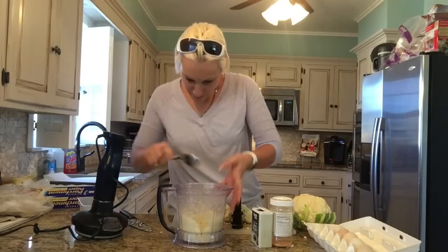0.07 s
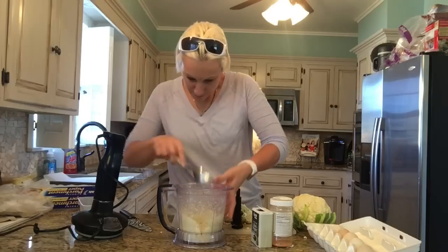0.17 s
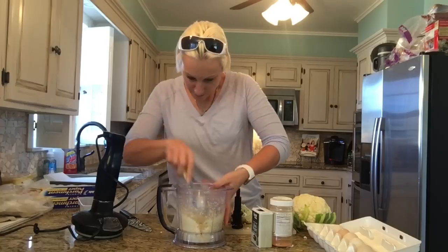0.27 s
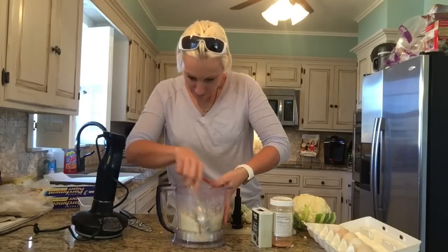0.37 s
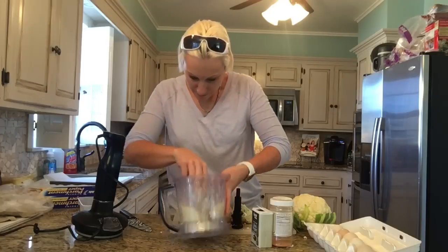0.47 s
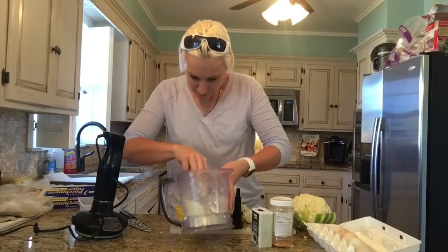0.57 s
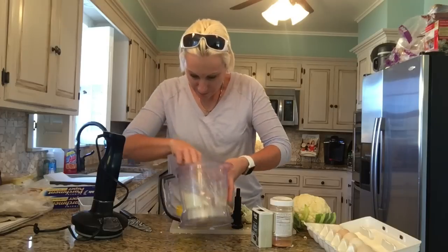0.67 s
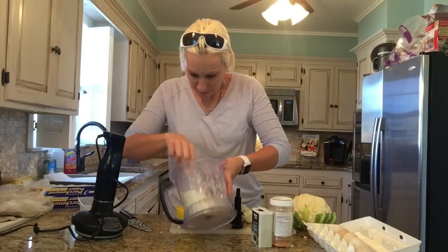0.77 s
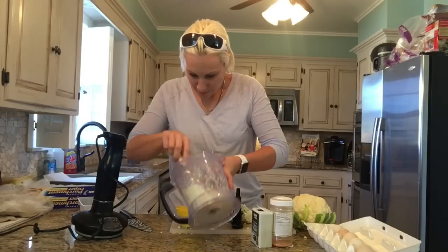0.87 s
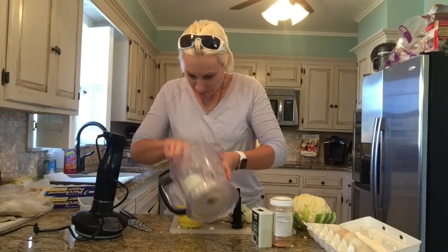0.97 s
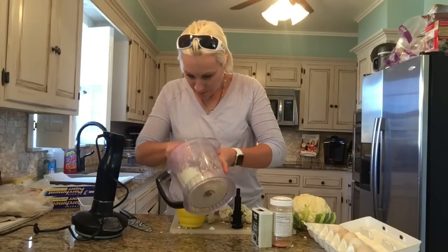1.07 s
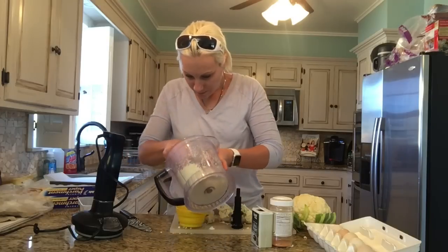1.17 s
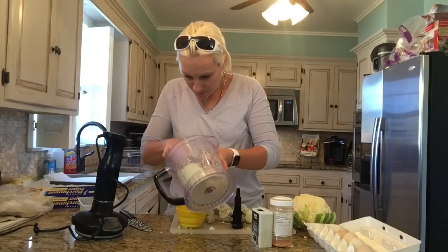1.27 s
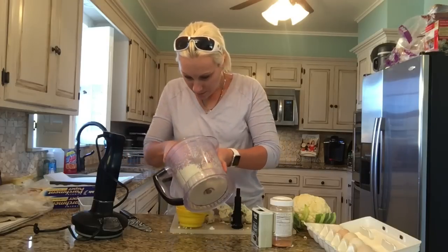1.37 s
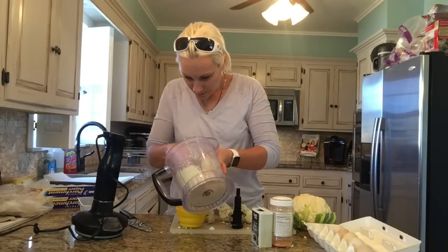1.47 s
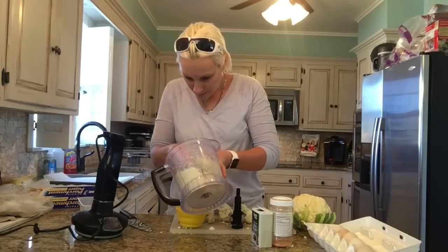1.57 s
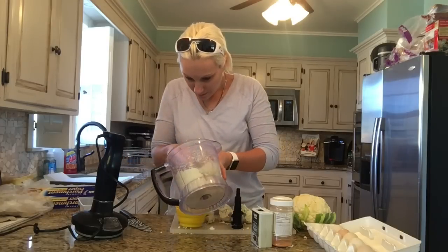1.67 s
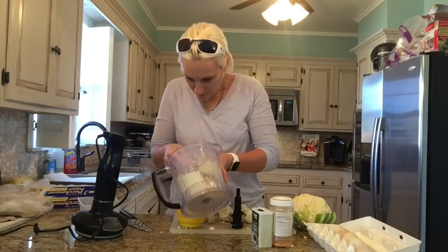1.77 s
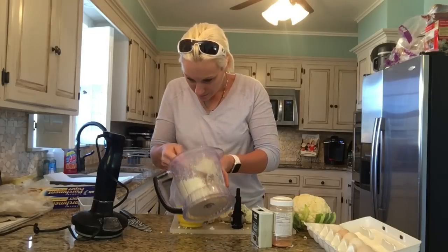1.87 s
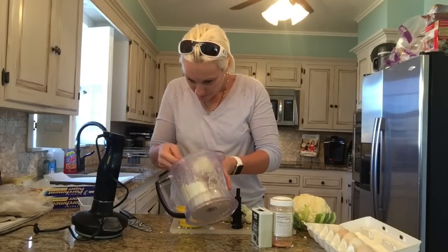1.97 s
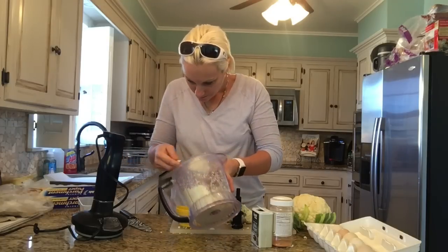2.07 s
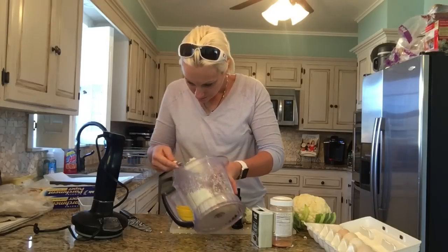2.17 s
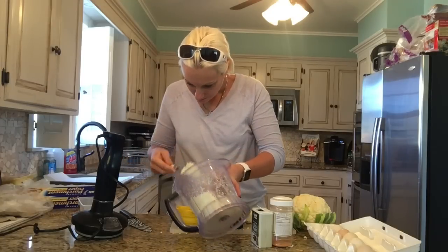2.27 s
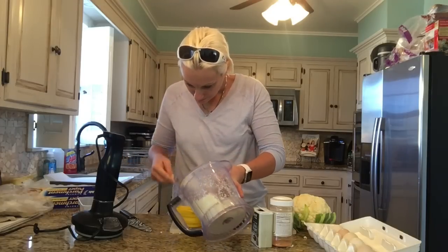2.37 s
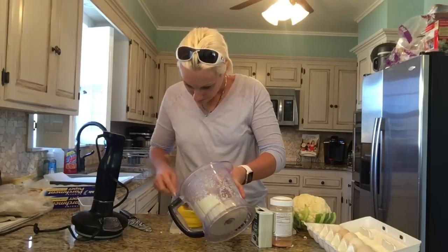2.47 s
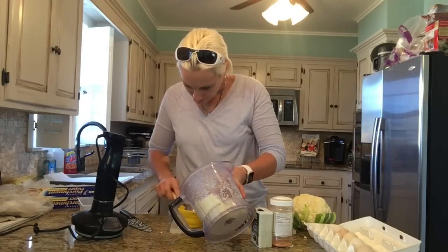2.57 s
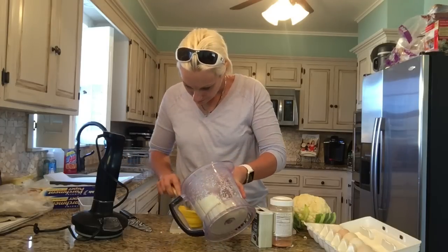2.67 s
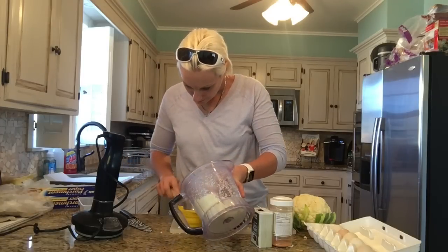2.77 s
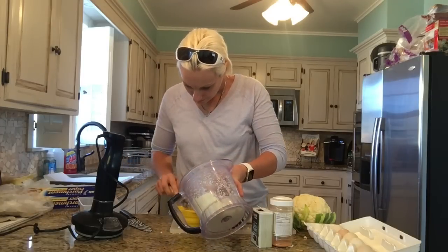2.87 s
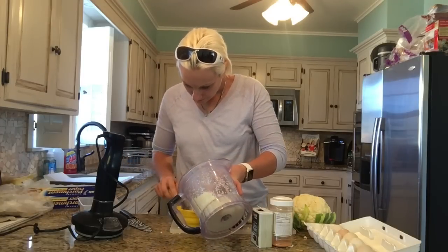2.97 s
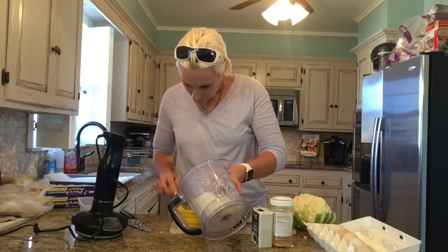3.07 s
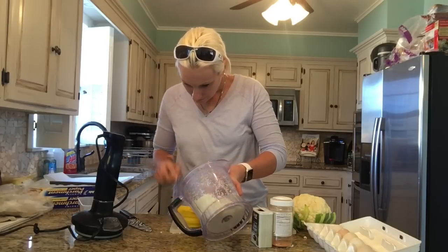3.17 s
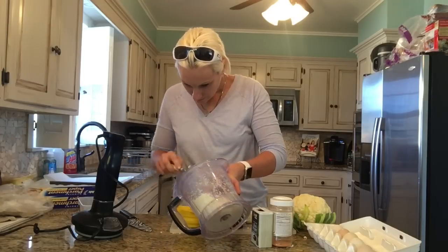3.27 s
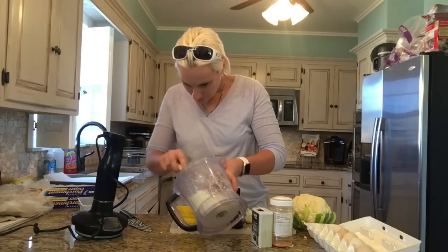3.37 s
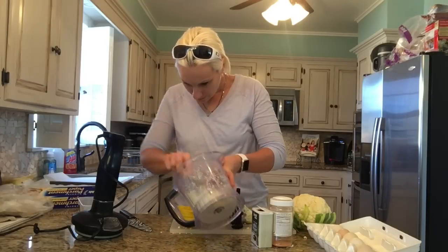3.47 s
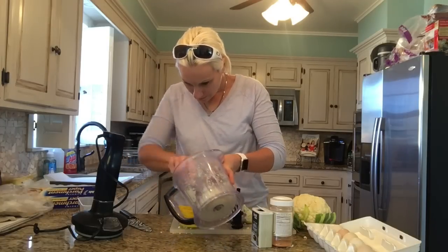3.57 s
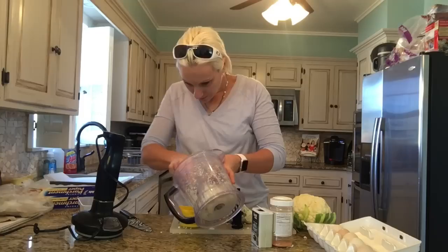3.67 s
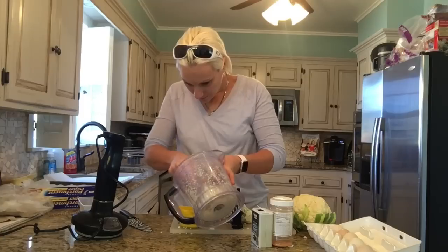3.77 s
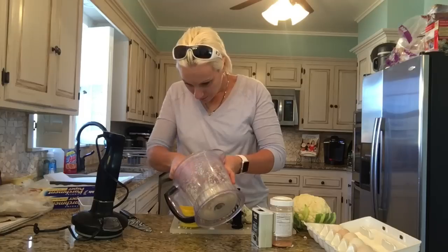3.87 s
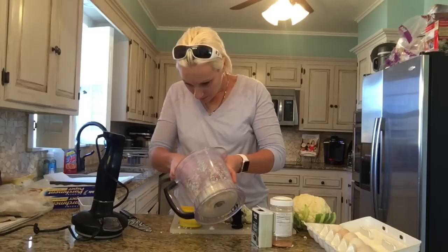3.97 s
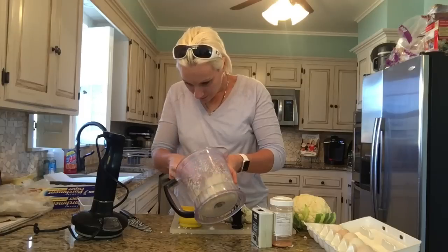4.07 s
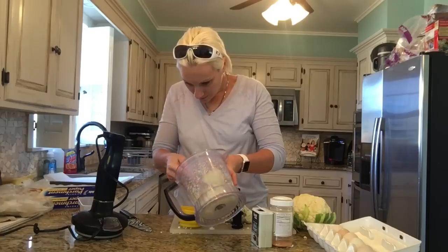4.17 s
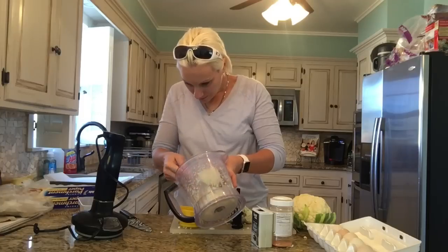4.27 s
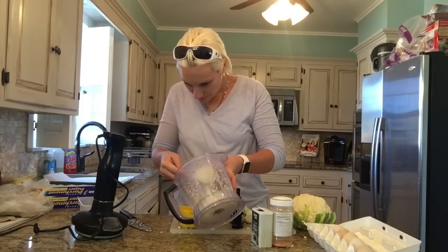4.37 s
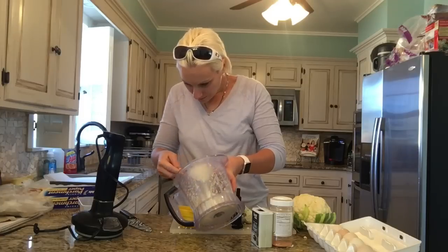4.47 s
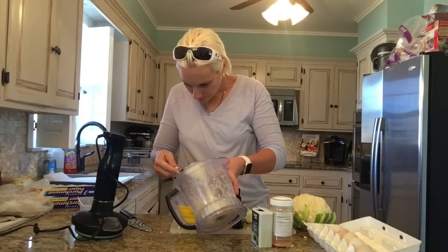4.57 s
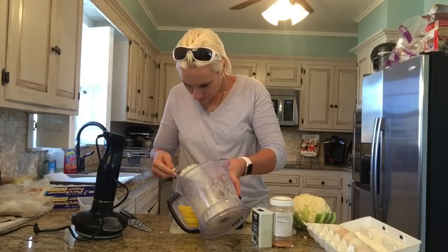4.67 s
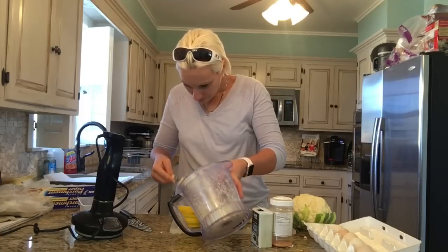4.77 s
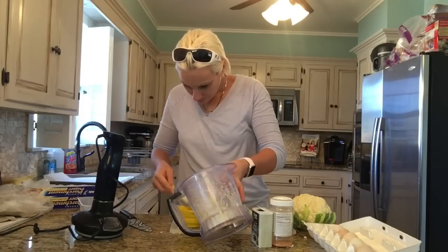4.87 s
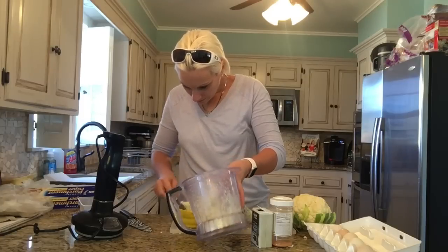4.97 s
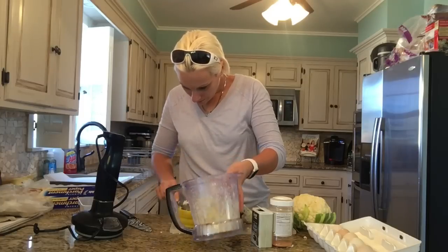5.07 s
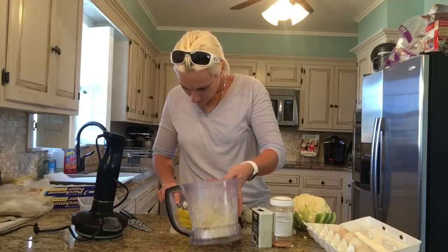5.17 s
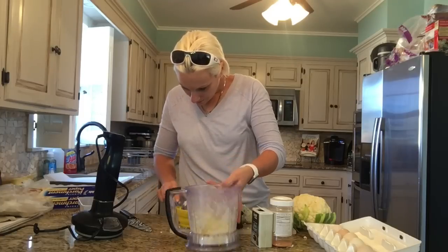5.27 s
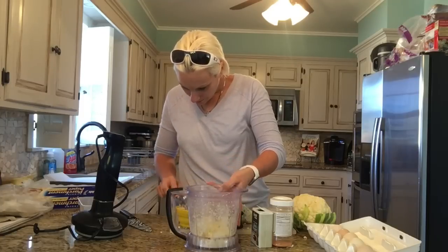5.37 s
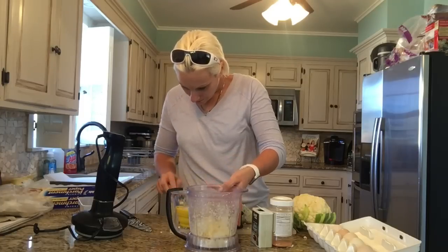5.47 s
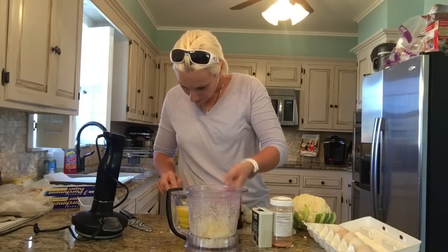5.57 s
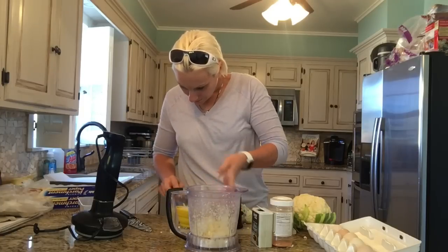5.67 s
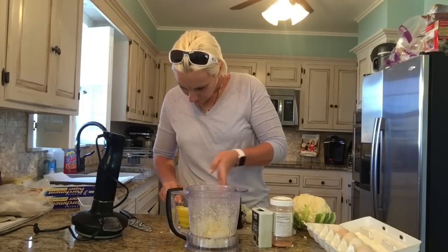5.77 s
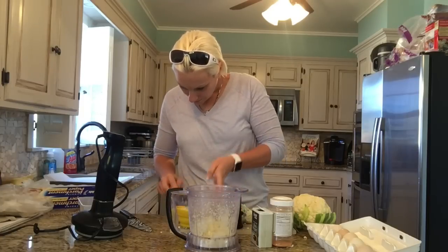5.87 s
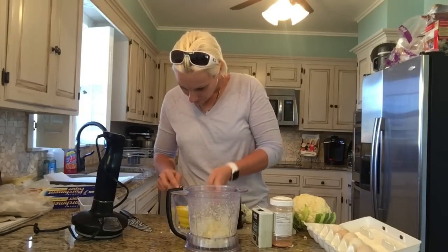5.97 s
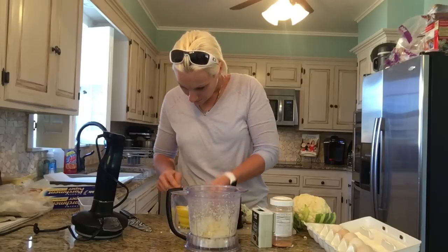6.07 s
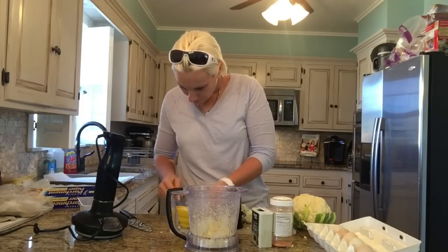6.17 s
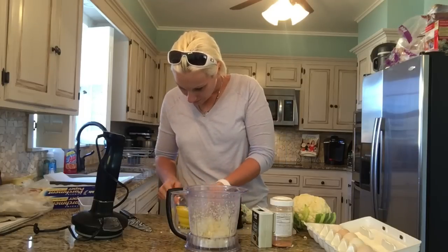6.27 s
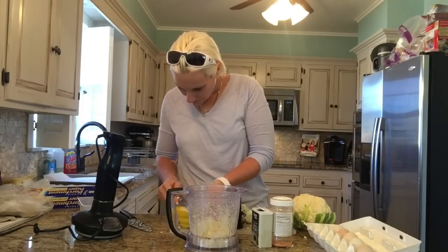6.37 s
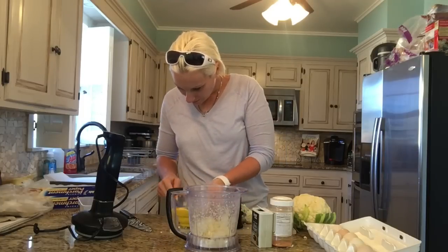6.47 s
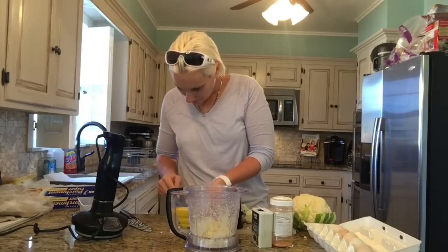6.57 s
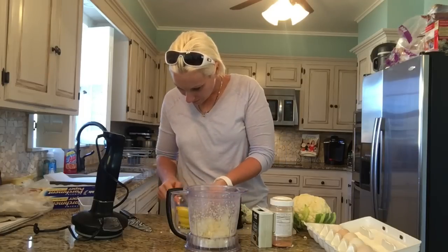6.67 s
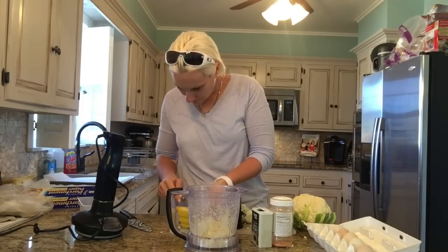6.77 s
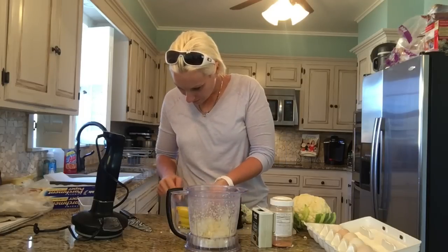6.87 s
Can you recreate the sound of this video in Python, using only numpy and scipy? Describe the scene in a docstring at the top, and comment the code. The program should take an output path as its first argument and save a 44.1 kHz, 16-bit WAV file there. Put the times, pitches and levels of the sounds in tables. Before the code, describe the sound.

A spoon knocks and scrapes in a plastic bowl, which is then set on a stone counter, over a faint appliance whine.

```python
"""Spoon in a plastic bowl

A spoon knocks and scrapes in a plastic food-processor bowl, which is then set down on a stone counter.
Each contact rings for a few hundredths of a second and the hard kitchen answers.
Behind it are air noise, mains hum and the thin wavering whine of an appliance."""
import sys
import numpy as np
from scipy import signal
from scipy.fft import rfft, irfft, next_fast_len
from scipy.io import wavfile
from scipy.ndimage import map_coordinates

SR = 44100
rng = np.random.default_rng(int(sys.argv[2]) if len(sys.argv) > 2 else 0)


def generate_wav(sig):
    """Save sig (samples, or channels by samples) to the path in sys.argv[1] as 16-bit PCM at SR."""
    pcm = np.round(np.clip(np.atleast_2d(sig).T, -1, 1) * 32767).astype(np.int16)
    wavfile.write(sys.argv[1], SR, pcm)


N = 305613

# Each row: frequency in Hz, t60 in seconds, level in dB struck at the tip, then at the neck.
SPOON_MODES = [(392, 0.03, -50, -16), (632, 0.029, -24.5, -8), (853, 0.027, -16, -5),
               (1447, 0.024, -19, -2), (1580, 0.076, -39, -3.5), (1752, 0.033, -1, -3.5),
               (2030, 0.022, -3.5, -21), (2150, 0.022, -20, -13), (2516, .025, -13, -15),
               (2817, 0.06, -20, -7.5), (3046, 0.02, -0.5, -28), (3500, 0.022, -10.5, -10),
               (3830, 0.015, -18, -2), (3985, 0.016, -10.5, 5), (4135, 0.019, -10, -15),
               (5260, 0.018, -14.5, 2), (6390, 0.0086, 0, -22), (6690, 0.015, -14, 2)]
# Each row: frequency in Hz, t60 in seconds, level in dB struck on the rim, then on the wall.
BOWL_MODES = [(386, 0.037, -24, -11), (538, 0.042, -21.5, -5), (827, 0.032, -17, -43), (1043, 0.034, 3, 1),
              (1146, 0.021, -21, 11), (1316, 0.039, -15.5, -7.5), (1614, 0.031, -12, -1),
              (1827, 0.03, -29, -0.5), (1928, 0.031, -5, -8), (2150, 0.05, -22.5, -2.5),
              (2308, .04, -16.5, -5), (2762, 0.028, -17, -16), (3203, 0.018, -17, -18),
              (3370, 0.017, -7.5, -31), (3633, 0.061, -16.5, -37.5), (4260, 0.017, -11.5, -16.5),
              (4402, 0.014, -24, 10.5), (5690, .013, -9.5, -17), (6220, .012, -25.5, -4)]
# Bowl foot and counter together. Each row: frequency in Hz, t60 in seconds, level in dB.
FOOT_MODES = [(149, 0.16, -33), (329.6, 0.069, -21), (471.4, 0.045, -12.5), (528, 0.034, -2),
              (674, 0.034, -6.5), (870, 0.032, -11), (969, 0.031, 2.5), (1670, 0.026, -15),
              (1804, 0.023, -8.5), (2140, 0.019, -22), (2650, 0.017, -15), (2950, 0.015, -18),
              (3203, 0.022, -17), (4370, 0.017, -18)]
# Each row: start in seconds, ring peak in dB, place (0 tip, 1 neck), rise in seconds,
# relative crack level in dB, crack tilt in dB per octave, relative echo level in dB.
SPOON_TAPS = [(0.437, -8, 0.092, 0.0034, -2, -0.1, -8.5), (1.3066, -15, 1, 0.00216, 3.5, 0.5, -8),
              (3.512, -38, 0.052, 0.0033, -5, -5, -11)]
# Columns as in SPOON_TAPS; place 0 is the rim, 1 the wall.
BOWL_KNOCKS = [(0.5182, -2, 0.0045, 0.0032, 1, 2, -9), (3.6038, -5, 0.77, 0.00083, -6, 0.3, -7)]
# The bowl lands and rocks. Columns as in SPOON_TAPS; place has no effect.
BOWL_LANDINGS = [(5.3135, -5, 0, 0.0034, -3, -4, -9), (5.4055, -20, 0, 0.0048, 1.5, -6.5, -6),
                 (5.446, -25.5, 0, 0.0033, -1, -8, -7)]
# Each row: start in seconds, level in dB.
SPOON_TICKS = [(.892, -48.5), (1.080, -47), (1.817, -52), (2.63, -54), (3.567, -52), (3.856, -47.5),
               (6.203, -60)]
# Each row: start in seconds, length in seconds, level in dB, wet share of the power from 0 to 1.
SCRAPE_STROKES = [(0.296, 0.21, -64.5, 0.5), (1.189, 0.058, -63, 0.3), (1.27, 0.045, -51, 0.23),
                  (2.96, 0.1, -64, 0.03), (3.463, 0.039, -63, 0.4), (3.504, 0.037, -53, 0.54),
                  (3.526, .08, -61, 0.9), (3.837, 0.03, -52.5, 0.04), (3.999, 0.061, -70, 0.64),
                  (6.117, 0.092, -58.5, 0.01)]
# Contact noise, spoon on plastic, moist food parting, room echo, moving air.
# Each row: frequency in Hz, relative level in dB.
CRACK_SPECTRUM = [(40, -38), (150, -14), (400, -4.5), (1500, 7), (3500, 8), (6500, -2), (8500, -7),
                  (12000, -16.5), (16000, -17.5)]
RUB_SPECTRUM = [(200, -10), (600, 2.5), (1800, 2.5), (4000, -6.5), (7000, -21), (15000, -42)]
WET_SPECTRUM = [(800, -36), (3000, 4), (6000, -1), (9000, -12), (15000, -14)]
ECHO_SPECTRUM = [(150, 1.5), (500, 5.5), (1000, -2.5), (2500, 3), (4500, -1.5), (6500, 3), (10000, -1.5),
                 (15000, -7)]
AIR_SPECTRUM = [(25, -23), (45, 1), (90, -0.5), (150, -3), (260, -2), (400, -9), (620, -7), (1150, -2.5),
                (1500, -8.5), (2500, -13), (4400, -22), (6600, -28), (7800, -35.5), (10500, -42)]
# Each row: frequency in Hz, t60 in seconds.
KITCHEN_DECAY = [(150, 0.36), (500, 0.45), (1000, 0.64), (2500, 0.56), (5000, 0.53), (8000, 0.4),
                 (15000, 0.39)]
# Each row: time in seconds, pitch in Hz.
WHINE_PITCH = [(0.0, 1069), (1.73, 1085), (2.1, 1094), (2.21, 1095), (2.64, 1104), (4.12, 1076),
               (4.52, 1081), (4.9, 1069), (5.06, 1080), (5.87, 1068), (5.98, 1084), (6.05, 1096),
               (6.18, 1081), (6.5, 1085), (6.8, 1113), (6.92, 1072)]
# Each row: start in seconds, length in seconds, level in dB.
WHINE_SPELLS = [(-.02, 0.36, -53.5), (0.847, 0.3, -55.5), (1.192, .17, -59), (1.387, .47, -54.5),
                (1.9, 0.84, -55), (2.952, 0.37, -53.5), (3.332, 0.69, -57), (4.035, 0.42, -55.5),
                (4.489, .52, -51.5), (5.031, 0.64, -54), (5.7, .27, -51), (6.023, 0.31, -52.5),
                (6.429, .22, -53.5), (6.773, 0.13, -51.5)]
# Each row: centre in Hz, half width in Hz, boost in dB.
AIR_RESONANCES = [(992, 11, 7), (2583, 76, 5), (4270, 220, 5), (6670, 160, 1.5)]
# Each row: frequency in Hz, rms level in dB.
HUM_TONES = [(49.5, -67.5), (70.5, -65), (120, -66), (241, -69.5)]


def strikes(modes, blows, crack_t60_s):
    """Each blow rings the modes as its place favours them, with a crack on top."""
    track, t = np.zeros(N), np.arange(SR // 5) / SR
    hz, t60_s, *levels_db = np.transpose(modes)[:, :, None]
    partials = np.sin(2 * np.pi * hz * t) * amp(-60 * t / t60_s)
    partials[1::2] *= -1  # neighbouring modes swing against each other
    for start_s, db, place, rise_s, crack_db, tilt_db_per_octave, echo_db in blows:
        swell = 1 - np.exp(-(t / rise_s) ** 2)  # the plastic flexes during contact
        mode_gains = amp((1 - place) * levels_db[0] + place * levels_db[-1])
        ring = swell * np.sum(partials * mode_gains, axis=0)
        burst = np.sqrt(swell) * crack(t, crack_t60_s, tilt_db_per_octave)
        blow = ring / np.abs(ring).max() + amp(crack_db) * burst / 2
        add(track, start_s, in_kitchen(amp(db) * blow, echo_db))
    return track


def crack(t, t60_s, tilt_db_per_octave=0, snap_db=5, snap_t60_s=0.012):
    """Hard things meet: a snap, then dense fading modes as noise. Soft contacts tilt it down."""
    spectrum = [(hz, db + tilt_db_per_octave * np.log2(hz)) for hz, db in CRACK_SPECTRUM]
    fade = amp(-60 * t / t60_s) + amp(snap_db - 60 * t / snap_t60_s)
    return coloured(rng.standard_normal(len(t)), spectrum) * fade / 2


def ticks(t60_s=0.047, echo_db=0.5):
    """The spoon's edge barely touches the plastic."""
    track, t = np.zeros(N), np.arange(SR // 20) / SR
    for start_s, db in SPOON_TICKS:
        add(track, start_s, in_kitchen(amp(db) * crack(t, t60_s) / 2, echo_db))
    return track


def scrapes(grain_db=5, echo_db=-0.5):
    """Strokes of tiny uneven slips: dull on bare plastic, hissing through moist food."""
    track = np.zeros(N)
    for start_s, length_s, db, wet_share in SCRAPE_STROKES:
        n = int(length_s * SR)
        slips = rng.standard_normal((2, SR // 2)) * amp(grain_db * rng.standard_normal(SR // 2))
        rub = np.sqrt(1 - wet_share) * coloured(slips[0], RUB_SPECTRUM)
        hiss = np.sqrt(wet_share) * coloured(slips[1], WET_SPECTRUM)
        stroke = (rub + hiss)[:n] * signal.windows.tukey(n, 0.5)
        add(track, start_s, in_kitchen(amp(db) * stroke, echo_db))
    return track


def in_kitchen(x, echo_db, build_s=0.0033, clump_db=2.0):
    """Direct sound plus a fresh diffuse echo, each frequency dying at its own rate."""
    hz, t, noise = signal.stft(rng.standard_normal(SR * 3 // 4), SR, nperseg=256)
    fade = amp(along(ECHO_SPECTRUM, hz)[:, None] - 60 * t / along(KITCHEN_DECAY, hz)[:, None])
    tail = signal.istft(noise * fade, SR, nperseg=256)[1]
    tail *= 1 - np.exp(-(np.arange(len(tail)) / SR / build_s) ** 2)  # nearest cabinets answer first
    tail *= amp(clump_db * signal.resample(rng.standard_normal(SR // 300), len(tail)))
    response = amp(echo_db) * tail / np.linalg.norm(tail)
    response[0] += 1
    return signal.fftconvolve(x, response)


def whine(rest_hz=1077, jitter_hz=2.54, flutter_db=2.1, shiver_db=1.85):
    """An appliance's tone, in spells. Its level ripples as the pitch drifts through standing waves."""
    attack_s, release_s, sag_db_per_s = 0.025, 0.022, 2
    standing_depth_db, standing_spacing_hz = 2, 28.8
    t, spells = np.arange(N) / SR, np.zeros(N)
    for start_s, length_s, db in WHINE_SPELLS:
        age_s = t - start_s
        gate = np.clip(np.minimum(age_s / attack_s, (length_s - age_s) / release_s), 0, 1)
        spells += gate * amp(db - sag_db_per_s * age_s)
    pitch_hz = np.interp(t, *np.transpose(WHINE_PITCH))
    standing_db = standing_depth_db * np.cos(2 * np.pi * (pitch_hz - rest_hz) / standing_spacing_hz)
    level = spells * amp(standing_db + flutter_db * wobble(16) + shiver_db * wobble(40))
    phase = 2 * np.pi * np.cumsum(pitch_hz + jitter_hz * wobble(25)) / SR
    return level * np.sqrt(2) * np.sin(phase)


def air(level_db=-53.5, waver_db=0.1):
    """Air rushes through a few resonances."""
    def resonances(hz):
        return amp(sum(db / (1 + ((hz - centre_hz) / half_width_hz) ** 2)
                       for centre_hz, half_width_hz, db in AIR_RESONANCES))

    level = amp(level_db + waver_db * wobble(3.127))
    return level * coloured(filtered(rng.standard_normal(N), resonances), AIR_SPECTRUM)


def hum(drift_rad=0.34):
    """Mains and motors hum, each tone slightly unsteady in phase."""
    t = np.arange(N) / SR
    return sum(amp(db) * np.sqrt(2) * np.sin(2 * np.pi * hz * t + drift_rad * wobble(3.55))
               for hz, db in HUM_TONES)


def scene():
    """Spoon, bowl and counter over the kitchen's background."""
    spoon = strikes(SPOON_MODES, SPOON_TAPS, crack_t60_s=0.088)
    bowl = strikes(BOWL_MODES, BOWL_KNOCKS, crack_t60_s=0.033)
    counter = strikes(FOOT_MODES, BOWL_LANDINGS, crack_t60_s=0.041)
    return (spoon + bowl + counter + ticks() + scrapes() + whine() + air() + hum())[None]


def record(dry):
    """Steep low-pass."""
    cutoff_hz, edge_hz = 16000, 200
    return filtered(dry[0], lambda hz: np.clip((cutoff_hz - hz) / edge_hz + 0.5, 0, 1))[None]


def amp(db):
    """Decibels to gain."""
    return 10 ** (np.asarray(db) / 20)


def along(points, hz):
    """(Hz, value) points interpolated on a log axis."""
    knots_hz, values = np.transpose(points)
    return np.interp(np.log(hz + 1), np.log(knots_hz), values)


def filtered(x, response):
    """x through a gain given as a function of Hz."""
    size = next_fast_len(len(x) + SR // 4)
    return irfft(rfft(x, size) * response(np.fft.rfftfreq(size, 1 / SR)), size)[:len(x)]


def coloured(x, spectrum):
    """x shaped by (Hz, dB) points, at rms 1."""
    shaped = filtered(x, lambda hz: amp(along(spectrum, hz)))
    return shaped / np.sqrt(np.mean(shaped ** 2) + 1e-20)


def wobble(knots_per_s):
    """A smooth random curve."""
    knots = rng.standard_normal(int(N * knots_per_s / SR) + 4)
    return map_coordinates(knots, [np.arange(N) * knots_per_s / SR])


def add(track, start_s, sound):
    """Mix a sound into the track."""
    part = track[round(start_s * SR):][:len(sound)]
    part += sound[:len(part)]


dry = scene()
out = record(dry)
generate_wav(out)
```